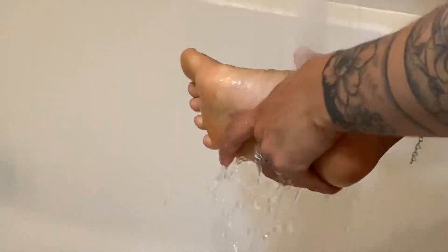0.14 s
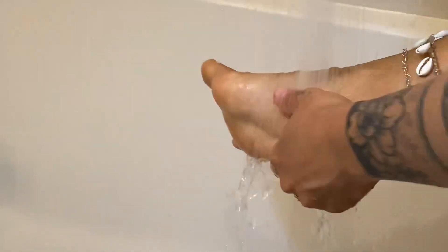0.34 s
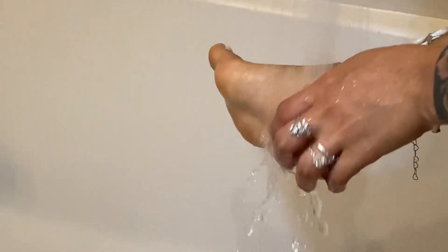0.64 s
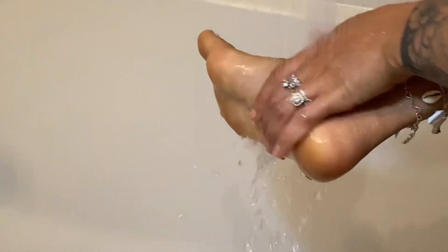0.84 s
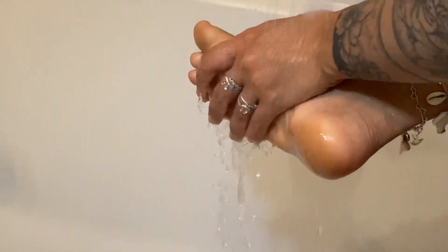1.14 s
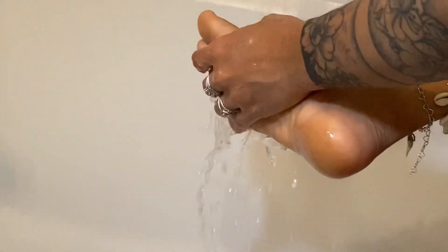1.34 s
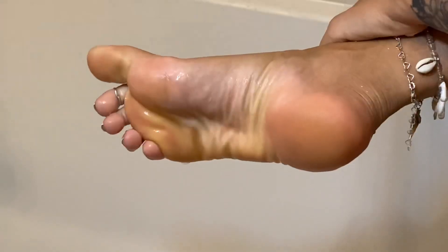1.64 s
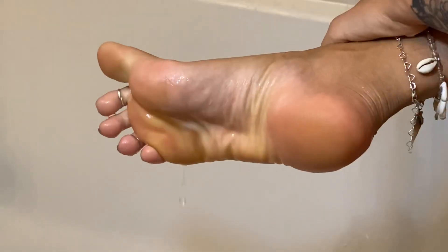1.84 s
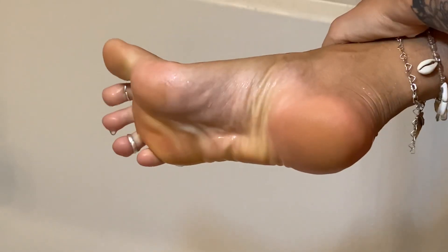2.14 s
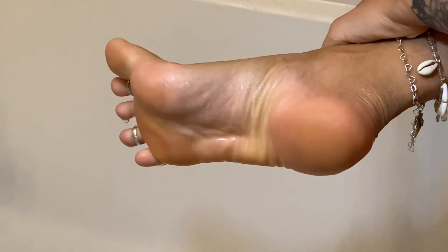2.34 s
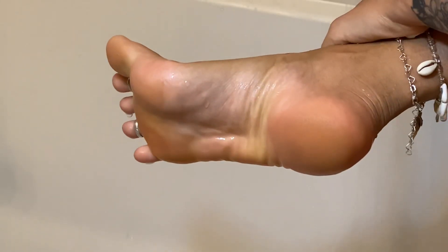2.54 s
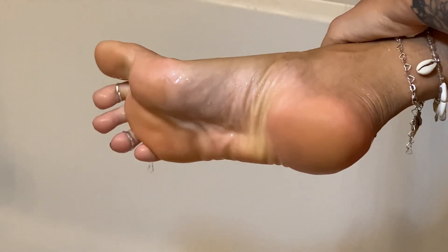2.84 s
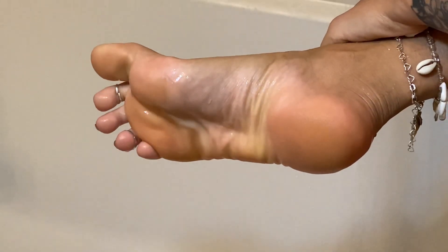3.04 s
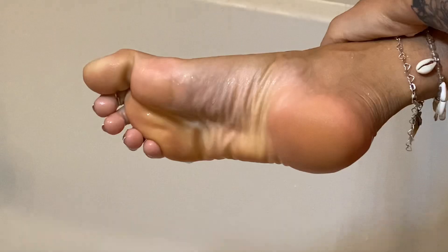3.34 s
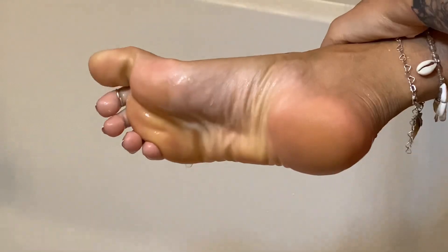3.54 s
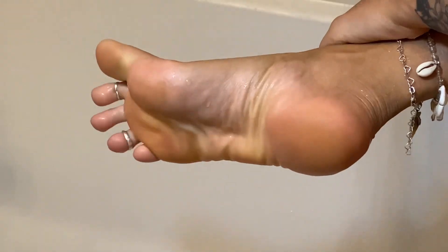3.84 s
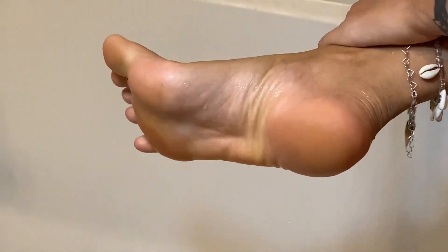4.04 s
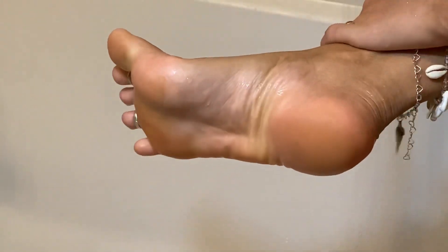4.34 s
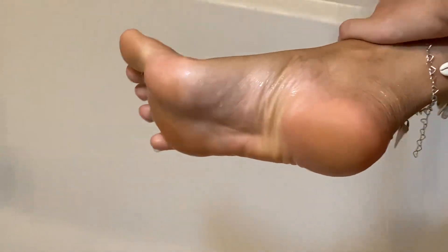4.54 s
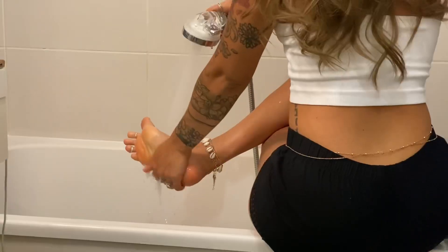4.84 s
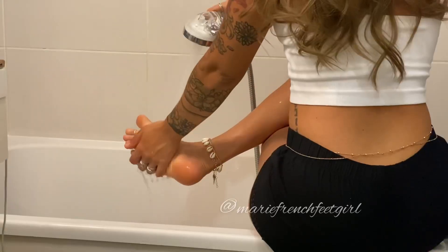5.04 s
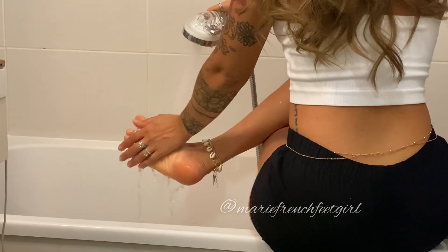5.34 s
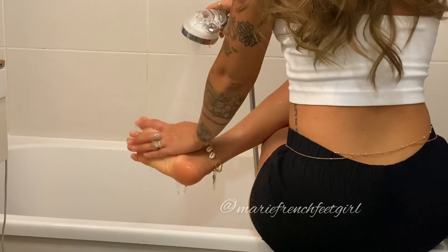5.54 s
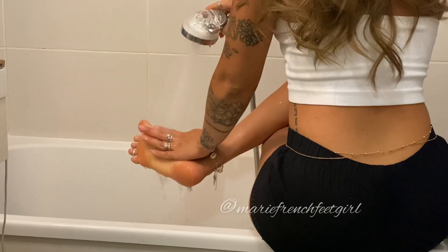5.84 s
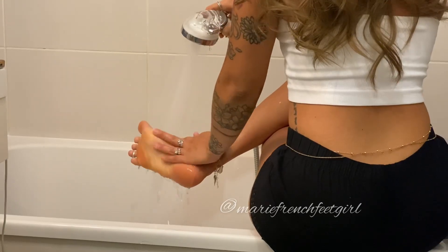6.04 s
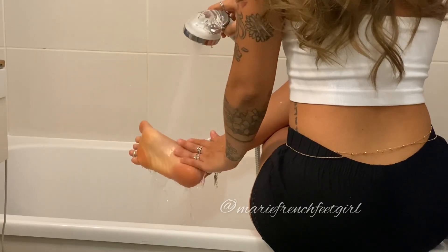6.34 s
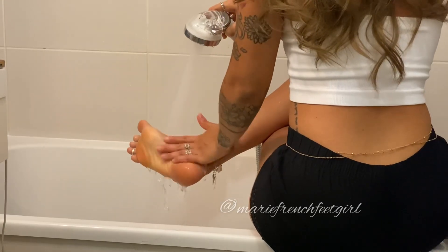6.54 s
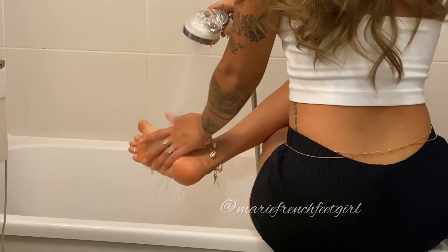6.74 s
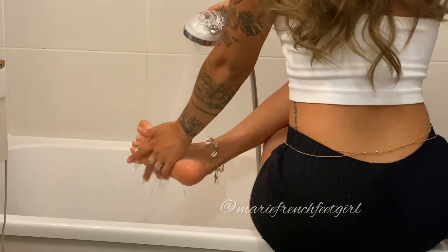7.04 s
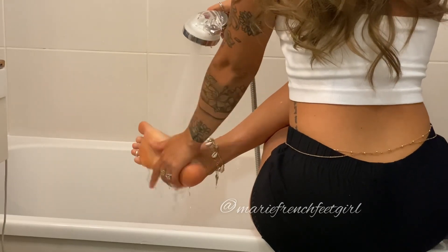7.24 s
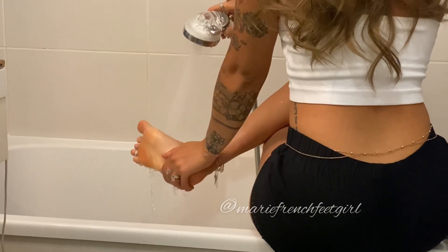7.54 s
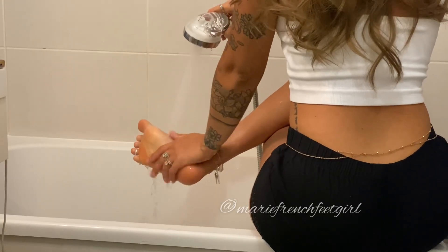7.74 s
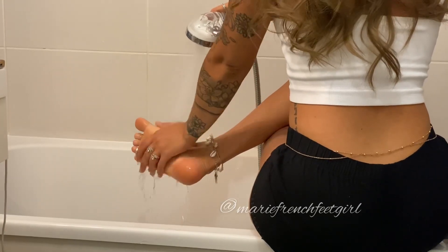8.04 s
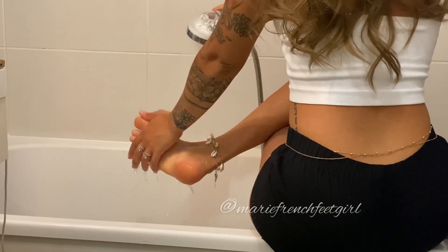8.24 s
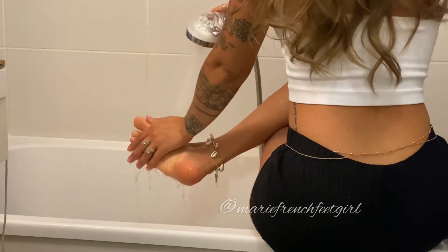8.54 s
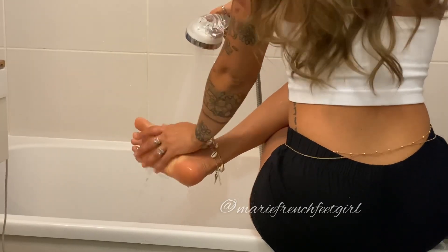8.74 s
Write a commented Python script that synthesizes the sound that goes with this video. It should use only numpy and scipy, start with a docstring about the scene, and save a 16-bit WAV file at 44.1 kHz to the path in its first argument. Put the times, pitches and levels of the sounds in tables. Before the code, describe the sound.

A hand shower runs in a small tiled bathroom. Close to the microphone, water spills off a rubbed foot in sharp irregular splats and bright patter, the tub drumming low. An abrupt change leaves only even spray hiss, pipe whistle and a flickering thin whine, with a few dull knocks. Then splashing returns from further back, softer and more echoing.

```python
"""A hand shower in a small tiled bathroom, heard in three parts joined by short fades.
First, water runs off feet into the tub close by: random drops patter and filtered bursts splat.
Then the spray hisses on without the run-off: shaped noise, singing pipe resonances and a thin whine, with knocks.
Last, the water runs off the feet again from further back, with slower splats and stronger echoes.
All through, random hits and wavering low tones make the tub shell drum."""
import sys
import numpy as np
from scipy import signal
from scipy.fft import rfft, irfft
from scipy.io import wavfile
from scipy.ndimage import uniform_filter1d

SR = 44100
rng = np.random.default_rng(int(sys.argv[2]) if len(sys.argv) > 2 else 0)


def master(y):
    """Save y as 16-bit WAV."""
    cut = np.clip(np.atleast_2d(y).T, -1, 1)
    pcm = np.round(cut * 32767)  # scale
    wavfile.write(sys.argv[1], SR, pcm.astype(np.int16))


N = 391608

# The joins between the three parts. Each row: time in seconds, fade-out in seconds, fade-in in seconds.
JOINS = [(1.475, 0.0061, 0.018), (4.662, 0.0022, 0.017)]
# Strength of the run-off from the feet, one list for the close part and one for the far part.
# Each row: time in seconds, level of the patter in dB, of the fine mist in dB, of the coarse drops in dB.
RUNOFF_LEVELS = [
    [(0, -45.5, -51, -49.5), (.12, -49.5, -51, -52.5), (.31, -40.5, -49, -56), (.43, -47, -49, -53),
     (.56, -42, -48, -57), (.83, -48.5, -49, -54), (.94, -41.5, -47, -54), (1.1, -48.5, -51, -53.5),
     (1.36, -45.5, -51.5, -49.5), (1.46, -49.5, -50, -53)],
    [(4.7, -53, -53, -71), (4.92, -46, -50.5, -58), (5.18, -50.5, -53, -75), (5.33, -47, -51, -56),
     (5.52, -47.5, -50, -57), (5.8, -51, -52, -75), (5.92, -49.5, -46.5, -57), (6.04, -49.5, -53, -60),
     (6.22, -46.5, -49.5, -51.5), (6.64, -49, -54, -52.5), (6.78, -49, -51, -66), (6.98, -56.5, -55.5, -78),
     (7.35, -46, -50.5, -55), (7.56, -48, -52, -60), (7.68, -49, -50, -55), (7.96, -45, -50, -54),
     (8.07, -53.5, -53, -82), (8.25, -50, -55, -66), (8.4, -51.5, -53.5, -58), (8.66, -46, -52.5, -59),
     (8.8, -51, -50, -58), (8.88, -52, -50, -57)],
]

T = np.arange(N) / SR  # time of every sample, seconds
F = np.arange(N // 2 + 1) * SR / N  # frequency of every spectrum bin, Hz
FIRST_JOIN_S, SECOND_JOIN_S = JOINS[0][0], JOINS[1][0]
PART = np.searchsorted([FIRST_JOIN_S, SECOND_JOIN_S], T)  # 0, 1 or 2 at every sample


def undb(db):
    """Turns decibels into a gain."""
    return 10 ** (np.asarray(db) / 20)


def unit(x):
    """Scales a sound to an rms (average strength) of 1."""
    return x / np.sqrt(np.mean(x ** 2))


def over_hz(table):
    """Reads a table of (Hz, value) at every bin, in straight lines over log frequency."""
    hz, value = np.transpose(table)
    return np.interp(np.log(F + 1), np.log(hz), value)


def over_time(lists):
    """Reads the columns of the joined lists at every sample."""
    s, *columns = np.transpose(np.concatenate(lists))
    return [np.interp(T, s, column) for column in columns]


def ring(x, hz, width):
    """Lets a sound excite one resonance, then scales it to rms 1."""
    return unit(signal.lfilter(*signal.iirpeak(hz, hz / width, fs=SR), x))


def walk(rate):
    """Slides between random levels, about `rate` new ones a second; their spread is near 1."""
    step = int(SR / rate)
    levels = np.repeat(rng.standard_normal(N // step + 1), step)
    return uniform_filter1d(levels, step)[:N]


def fading(t, t60):
    """Falls by 60 dB in t60 seconds."""
    return np.exp(-np.log(1000) * t / t60)


def drops(rate, scatter_db, size=N):
    """Makes impacts at random moments, `rate` a second; a few are much larger than the rest."""
    hit = rng.random(size) < rate / SR
    return hit * rng.standard_normal(size) * undb(scatter_db * rng.exponential(size=size))


def hum_level(steady_db, swells):
    """Gives the gain of a tone: a steady level that wanders, with strong swells rising above it."""
    wander_db, changes_per_s = 1.6, 9.9
    power = undb(steady_db + wander_db * walk(changes_per_s)) ** 2
    for s, db, length in swells:
        power += undb(db) ** 2 * np.exp(-((T - s) / (length / 2)) ** 2)
    return np.sqrt(power)


def spray():
    """The jets hiss evenly as shaped noise, while narrow resonances of pipe and head sing."""
    # Colour of the hiss. Each row: frequency in Hz, level in dB per Hz before the gain of each part.
    hiss_colour = [(300, -100), (500, -93), (1000, -98), (1350, -93.5), (1650, -92), (2050, -92.5),
                   (3600, -93.5), (5500, -93), (7000, -93.5), (7900, -90.5), (9700, -99.5), (11300, -93.5),
                   (13000, -100), (15800, -99)]
    # Resonances of pipe and head. Each row: frequency in Hz, width in Hz, level in dB before the gain of each part.
    whistle_modes = [(1294, 7.5, -80), (1388, 10, -65.5), (1445, 12, -63), (1494, 15, -64.5),
                     (1556, 15, -65.5), (1613, 33, -56.5), (1752, 29, -61), (1900, 34, -65.5),
                     (2040, 33, -73.5), (2130, 44, -66.5), (2620, 16, -67.5), (3040, 16, -70),
                     (4860, 20, -67), (5580, 60, -63.5), (5820, 40, -64.5), (6490, 18, -65),
                     (7860, 81, -62), (11050, 28, -64), (10700, 43, -80)]
    # Gain in the three parts. Each row: gain of the hiss in dB, gain of the whistle in dB.
    part_gains = [(-22, -3.5), (1.5, -0.5), (-1.5, -10.5)]
    hiss_db, sing_db = np.transpose(part_gains)[:, PART]
    hiss = irfft(rfft(rng.standard_normal(N)) * undb(over_hz(hiss_colour)), N) * np.sqrt(SR / 2)
    flow = rng.standard_normal(N)
    singing = sum(undb(db) * ring(flow, hz, width) for hz, width, db in whistle_modes)
    return hiss * undb(hiss_db + 0.38 * walk(3.8)) + undb(sing_db) * singing


def whine():
    """A thin tone and a narrow band of noise flicker unevenly in the middle part."""
    # Strong swells of the whine. Each row: time of the top in seconds, level in dB, length in seconds.
    whine_swells = [(1.56, -60, .08), (1.7, -55, .14), (1.84, -62, .05), (1.98, -59, 0.088),
                    (2.19, -60, 0.054), (2.35, -62, 0.16), (2.763, -59.5, 0.093), (2.902, -53.5, 0.26),
                    (3.17, -62, .05), (3.272, -57, 0.045), (3.505, -65, .04), (3.6, -59.5, .1),
                    (3.873, -58, .07), (4.03, -55, .04), (4.12, -59, 0.14), (4.36, -57, .08),
                    (4.59, -56, .12)]
    pitch_hz, steady_db = 4487, -64
    tone = np.sqrt(2) * np.sin(2 * np.pi * np.cumsum(pitch_hz + 3.57 * walk(30.13)) / SR)
    flicker = ring(rng.standard_normal(N), pitch_hz, 24)
    return (0.75 * tone + 0.32 * flicker) * hum_level(steady_db, whine_swells) * (PART == 1)


def tub():
    """Falling water drums the shell: low modes hum, upper ones rattle, and now and then something knocks."""
    # Upper modes of the shell. Each row: frequency in Hz, width in Hz, level in dB against each other.
    upper_modes = [(221, 55, 0.5), (281, 61, -2.5), (331.3, 45, -6.5), (422.2, 6.6, -7), (459, 24, -9),
                   (553.3, 18, -12), (642, 78, -18), (690, 47, -15.5)]
    # Lowest modes of the shell. Each row: the frequencies in the three parts in Hz, size of the wander in Hz.
    low_modes = [((60, 60, 59), 4.72), ((96, 97, 93), 6.54), ((156, 150, 144), 5.8), ((208, 215, 178),
                 4.14)]
    # Shell level in the three parts: one column for all upper modes together, then one for each low mode. Each
    # row is one part: level of all upper modes in dB, then of each low mode in dB.
    shell_levels = [(-56, -49.5, -49.5, -49, -53.5), (-57.5, -60, -62.5, -64, -61.5),
                    (-52, -53.5, -56.5, -50.5, -53.5)]
    # Strongest swells, one list for each low mode. Each row: time of the top in seconds, level in dB,
    # length in seconds.
    low_swells = [
        [(.3, -56, .2), (1.3, -60, 0.12), (1.6, -48, 0.2), (4.92, -53, 0.089), (5.46, -47, .12),
         (5.84, -48, .1), (6.2, -47, 0.1), (7.1, -46, 0.13), (7.3, -46, .15), (7.57, -49, 0.11),
         (8.68, -47, 0.12)],
        [(.07, -41, 0.17), (.29, -52, 0.052), (.48, -42.5, 0.14), (.73, -43, 0.13), (1.08, -45, 0.13),
         (1.22, -42, 0.13), (6.19, -57, .1)],
        [(.08, -49, 0.12), (.26, -38, 0.023), (.67, -43, 0.049), (.91, -48, 0.058), (1.22, -42.5, 0.12),
         (4.92, -48, 0.1), (6.186, -39, 0.065), (8.16, -63, 0.071), (8.557, -50, 0.052), (8.7, -47, 0.07)],
        [(.08, -45.5, 0.15), (.91, -43, 0.067), (2.68, -53.5, 0.051), (3.5, -56.5, 0.13), (6.2, -46, 0.22),
         (7.55, -47.5, 0.21)],
    ]
    # Knocks on the tub. Each row: start in seconds, level in dB, frequency in Hz, time to fall 60 dB in seconds.
    knocks = [(1.53, -24.5, 102.4, 0.11), (1.575, -35.5, 93, 0.24), (4.463, -31.5, 87, 0.063),
              (4.602, -33, 131, 0.094), (4.621, -21, 86, 0.059)]
    upper_db, *low_db = np.transpose(shell_levels)[:, PART]
    upper = sum(undb(db) * ring(drops(600, 1.8), hz, width) for hz, width, db in upper_modes)
    out = undb(upper_db) * unit(upper)

    body_hz, body_width_hz, body_db = 250, 96, (-52.5, -65, -60)  # broad drumming; its level in each part
    out += undb(body_db)[PART] * ring(drops(600, 0.67), body_hz, body_width_hz)

    for (hz, wander), level_db, swells in zip(low_modes, low_db, low_swells):
        pitch = np.array(hz)[PART] + wander * walk(18)
        tone = np.sqrt(2) * np.sin(2 * np.pi * np.cumsum(pitch) / SR)
        hits = drops(600, 0.6)
        rattle = np.choose(PART, [ring(hits, f, f / 8.5) for f in hz])
        mix = 0.62 * undb(0.65 * walk(26)) * tone + 0.68 * rattle
        out += hum_level(level_db, swells) * mix

    for s, db, hz, t60 in knocks:
        t = np.maximum(T - s, 0)
        onset = 1 - np.exp(-t / 0.0049)
        out += undb(db) * onset * fading(t, t60) * np.sin(2 * np.pi * hz * t)
    return out


def bubbles():
    """Drops trap tiny bubbles: short blips of a few kHz that rise in pitch."""
    per_s, against_patter_db = 130, -12
    length_cycles, glide = 15.7, 0.088  # blip length at its starting pitch; rise of pitch as a share
    out, flow_db = np.zeros(N + SR), over_time(RUNOFF_LEVELS)[0]
    for a, b, c in rng.random((int(per_s * N / SR), 3)):
        i, hz = int(a * N), 2600 * 3.02 ** b
        cycle = np.arange(int(length_cycles * SR / hz)) * hz / SR
        swell = np.sin(np.pi * cycle / length_cycles)
        blip = swell * np.sin(2 * np.pi * cycle * (1 + glide * cycle / length_cycles / 2))
        extra_db = -2.0 * np.log(1 - c)  # a few are much louder
        out[i:i + len(blip)] += undb(flow_db[i] + against_patter_db + extra_db) * blip
    return out[:N] * (PART != 1)


def runoff():
    """Drops of three sizes patter into the tub in an unsteady stream, as shaped random impacts and noise."""
    # Colour of the middle-sized drops. Each row: frequency in Hz, gain in dB.
    patter_colour = [(1500, -40), (2600, -4.5), (3600, -0.5), (6000, 1), (8000, 3), (10500, -6.5)]
    # Colour of the coarse drops. Each row: frequency in Hz, gain in dB.
    coarse_colour = [(500, 5), (1000, -13), (1800, 4.5), (2600, 2.5), (3600, 2.5), (5000, -9.5)]
    # Colour of the fine mist. Each row: frequency in Hz, gain in dB.
    mist_colour = [(5500, -46), (8000, -8), (10000, -5), (12000, -5), (13800, -24), (15800, -24)]
    surge_db, flicker_db = 1.0, 1.3  # unsteadiness: all drops together, each size alone
    surge, out = walk(12), 0
    patter_db, mist_db, coarse_db = over_time(RUNOFF_LEVELS)
    sizes = [(patter_colour, patter_db, 8000), (coarse_colour, coarse_db, 3000), (mist_colour, mist_db, 12000)]
    for colour, db, rate in sizes:
        rain = unit(drops(rate, 1.0)) + 0.6 * rng.standard_normal(N)
        rain = unit(irfft(rfft(rain) * undb(over_hz(colour)), N))
        out = out + rain * undb(db + surge_db * surge + flicker_db * walk(25))
    return out * (PART != 1)


def droplets(hz, octaves, t60, size):
    """Each slug throws short blips, scattered over its band and its tail."""
    count, loudest_db, length_s = 14, 2.5, 0.0033
    mean_delay = 0.16  # as a share of t60
    out, t = np.zeros(size + 512), np.arange(512) / SR
    a, b, c = rng.random((count, 3)).T[:, :, None]
    late = -np.log(1 - a) * mean_delay * t60
    pitch = hz * 2 ** (1.25 * octaves * (b - .5))
    swell = np.sin(np.pi * np.minimum(t / length_s, 1))
    blips = undb(loudest_db - 9.3 * c) * swell * np.sin(2 * np.pi * pitch * t * (1 + 8 * t))
    starts = np.minimum(late[:, 0] * SR, size).astype(int)
    for i, blip in zip(starts, blips):
        out[i:i + 512] += blip
    return out[:size]


def splat(hz, fine_db, octaves, rise_s, smack, t60, size):
    """One slug builds up to a broad short smack, then a fading spatter around its pitch with fine spray above."""
    hold_per_rise = 1.4  # the spatter keeps full strength for this many build-up times
    t = np.arange(size) / SR
    edge = 2 ** (np.clip(octaves, .1, 3) / 2)
    spatter = drops(20000, 0.9, size=size)

    def band(low, high):
        """Keeps one band of the spatter, at rms 1."""
        return unit(signal.sosfilt(signal.butter(2, [low, high], "band", fs=SR, output="sos"), spatter))

    broad = band(hz / edge / 1.22, hz * edge * 1.73)
    body = band(hz / edge, hz * edge)
    fine = band(hz * edge, 13500)

    smack, after = np.clip(smack, 0, 1), np.maximum(t - rise_s, 0)
    ragged = undb(0.5 * np.repeat(rng.standard_normal(size // 256 + 1), 256)[:size])  # the tail comes in clumps
    held = fading(np.maximum(after - hold_per_rise * rise_s, 0), t60)
    tail = ragged * held * (0.7 * body + 0.42 * broad + droplets(hz, octaves, t60, size))
    tail += 1.7 * undb(fine_db) * fading(after, 0.57 * t60) * fine

    brief = np.exp(-((t - rise_s) / (0.0021 + 0.15 * rise_s)) ** 2)
    slap = 0.43 * body + 0.57 * broad
    # even out chance differences, so that every smack lands at its given strength
    slap = 0.81 * slap * np.sqrt(np.sum(brief ** 2) / np.sum((brief * slap) ** 2))
    build_up = np.minimum(t / max(rise_s, 1e-4), 1) ** 0.88
    return build_up * (smack * brief * slap + (1 - smack) * tail)


def splats():
    """Large slugs of water land, and between them many small ones that follow the run-off."""
    # Large slugs. Each row: start in seconds, level in dB, centre in Hz, level of the fine spray in dB
    # against the slug, width in octaves, build-up in seconds, share of the smack from 0 to 1,
    # time for the spatter to fall 60 dB in seconds.
    large_slugs = [(.0156, -40.5, 3400, -19, 0.28, 0.0037, 0.16, .3),
                   (.0567, -43, 5070, -9, 0.34, .003, .3, .3),
                   (.213, -36.5, 3020, -20, .39, 0.0013, 0.4, 0.2),
                   (.238, -45, 3600, -8, .5, .003, 0.6, 0.18), (.2125, -42, 5500, -5, 1, .001, 0.9, 0.16),
                   (.282, -28, 3300, -20, 0.46, 0.0056, 0.72, 0.27),
                   (.322, -34, 6000, -13, 0.92, .005, 0.55, 0.21),
                   (.4254, -52, 6200, -11, .4, .002, .5, .2), (.4876, -30, 6460, -19, 1, .001, 0.4, 0.37),
                   (.502, -36, 2100, -30, .5, 0.0013, 0.66, .15),
                   (.5025, -21.5, 4020, -25, 0.8, 0.0028, 0.7, 0.26),
                   (.6312, -28.5, 4800, -19, 0.22, 0.0011, .75, 0.18),
                   (.699, -37.5, 5730, -11, 0.94, .001, 0.6, 0.25),
                   (.7603, -31.5, 3900, -20, 0.71, .0012, 0.56, 0.33),
                   (.8915, -44, 4700, 2, 0.47, .001, 0.6, 0.27),
                   (.9318, -39, 6100, -20, 0.86, .002, 0.3, 0.4),
                   (1.0025, -41, 4900, 6.5, 0.32, .001, 0.62, 0.3),
                   (1.128, -34.5, 5700, -10, .3, .001, 0.57, 0.21),
                   (1.1487, -38, 4100, -11, 1, .001, 0.44, 0.2),
                   (1.2167, -32, 7460, 0.5, 0.4, .001, 0.75, 0.21),
                   (1.26, -36, 3530, -14, 0.72, .002, 0.77, 0.18),
                   (1.279, -43, 5500, 10, 0.97, 0.00092, 0.53, 0.13),
                   (1.309, -45, 4940, 8, .63, .001, 0.65, 0.27),
                   (1.3355, -31.5, 5150, -5, 0.46, .001, 0.59, 0.3),
                   (1.3833, -37, 4470, -12, .55, .001, 0.6, 0.26),
                   (1.444, -29.5, 2900, -32, 0.84, 0.0045, 0.66, 0.36),
                   (4.688, -43, 5000, -13, .49, .004, 0.44, 0.28),
                   (4.85, -45, 4310, 6, .55, .005, 0.6, 0.24),
                   (4.8787, -36, 6150, -27, 0.85, 0.0042, 0.53, 0.29),
                   (5.048, -42, 3900, -10, 0.31, 0.0064, 0.3, 0.35),
                   (5.09, -55, 4000, -20, 0.24, 0.0074, 0.5, 0.25),
                   (5.29, -34.5, 4400, -5, 0.36, 0.0098, 0.64, 0.22),
                   (5.292, -41, 3070, -25, 0.35, 0.0061, 0.5, 0.33),
                   (5.32, -47, 4400, -25, 0.16, .005, 0.5, .2),
                   (5.4536, -38, 4700, -7, 1, 0.0052, 0.6, 0.2),
                   (5.5066, -43, 6260, -2, .55, 0.0069, 0.26, 0.28),
                   (5.528, -39, 4740, -9, .35, 0.0053, 0.37, 0.35),
                   (5.6423, -47, 2480, -10, 0.36, 0.0037, 0.5, 0.21),
                   (5.7074, -43.5, 5950, -18, 0.49, .005, 0.3, 0.3),
                   (5.722, -42.5, 3620, -18, 0.99, 0.0044, 0.37, 0.25),
                   (5.8954, -48, 4640, 4, .55, 0.0043, .5, 0.47),
                   (6.0551, -44.5, 3310, -13, 0.89, .004, 0.47, 0.33),
                   (6.134, -34.5, 2630, -14, 0.7, 0.0034, 0.3, 0.22),
                   (6.14, -30.5, 2380, -32, 0.35, .005, 0.74, 0.18),
                   (6.145, -41, 5730, -3, 0.57, 0.0089, 0, 0.3), (6.158, -40, 2320, -25, .6, .005, .3, .3),
                   (6.162, -33.5, 5800, -12, 0.25, 0.0065, 0.75, 0.4),
                   (6.185, -42, 6000, -7, .4, 0.0064, .2, 0.35),
                   (6.192, -41.5, 3270, -20, 0.61, .006, 0.44, 0.54),
                   (6.5183, -46, 5630, -6, 0.78, 0.0035, 0.1, 0.55),
                   (6.656, -44.5, 4630, 4, 0.42, .004, 0.5, 0.53),
                   (6.74, -50, 4300, -15, 0.55, .008, 0.3, 0.27),
                   (6.858, -48, 5400, -20, .3, .005, .3, 0.18),
                   (6.9644, -46, 5160, -16, 0.29, .004, 0.37, 0.37),
                   (7.0, -44, 3950, -20, 0.38, .004, .5, 0.23),
                   (7.1227, -43, 6760, -19, 0.54, 0.0034, 0.4, 0.28),
                   (7.16, -39, 5790, -10, 1, 0.0045, 0.85, 0.23),
                   (7.257, -44, 5040, -14, 0.58, 0.0066, 0.2, 0.24),
                   (7.278, -37.5, 5700, -16, 0.95, 0.0061, 0.5, 0.23),
                   (7.3, -42.5, 3540, -1, 0.33, 0.0051, 0.45, .2),
                   (7.336, -40, 5300, -16, .2, 0.018, 0.4, .2),
                   (7.388, -40, 3380, -20, 0.35, 0.0054, 0.4, 0.24),
                   (7.401, -41, 5270, -15, 0.42, .006, .6, .15),
                   (7.459, -43, 2940, -2, 0.86, 0.0088, 0.35, 0.18),
                   (7.631, -42, 3270, -12, 0.8, 0.0061, 0.28, 0.32),
                   (7.766, -40, 4470, -14, .6, 0.006, 0.7, 0.16),
                   (7.857, -38.5, 5460, -20, 0.8, 0.01, 0.25, 0.33),
                   (7.919, -39, 5330, -2, 1, 0.0096, 0.7, 0.23),
                   (8.144, -42, 3800, -11, 0.72, 0.0044, 0.23, 0.28),
                   (8.171, -35, 7100, -33, 0.48, 0.0061, 0.34, 0.17),
                   (8.17, -39.5, 2860, -25, 0.66, 0.0071, 0.3, 0.28),
                   (8.176, -40, 4600, -20, 0.51, 0.0066, 0.44, 0.27),
                   (8.194, -41, 4930, -27, 0.67, 0.0047, 0.4, 0.38),
                   (8.24, -45, 2700, -16, .45, 0.004, 0.54, 0.25),
                   (8.281, -39, 4440, -10, 0.65, 0.0085, 0.25, 0.31),
                   (8.439, -42, 3130, -8, 0.8, 0.0074, 0.2, 0.19),
                   (8.47, -47.5, 3320, -20, .6, .006, 0.3, .25),
                   (8.587, -37.5, 4960, -0.5, 0.4, 0.0062, 0.57, 0.31),
                   (8.638, -39, 3030, -20, 0.28, 0.004, 0.36, 0.27),
                   (8.674, -33, 3880, -28, 1, 0.0083, 0.5, 0.23),
                   (8.705, -49, 5630, -20, .3, .004, .5, .15), (8.8064, -44, 6840, -7, 0.44, .003, 0.5, .2)]
    rise_near_s, rise_far_s = 0.001, 0.0049  # small slugs; from further back the tiles blur each smack
    out, flow_db = np.zeros(N + SR), over_time(RUNOFF_LEVELS)[0]
    slugs = list(large_slugs)
    for a, b, c in rng.random((500, 3)):
        s = a * N / SR
        if not FIRST_JOIN_S < s < SECOND_JOIN_S:
            db = flow_db[int(s * SR)] - 5.5 + 5.2 * c
            rise_s = rise_near_s if s < SECOND_JOIN_S else rise_far_s
            slugs.append((s, db, 4200 * 2.48 ** b, -15, .3, rise_s, .3, .15))
    for s, db, *kind in slugs:
        sound = splat(*kind, size=13200 if db > -44 else 8800)
        to_joins = [int((join - s) * SR) for join, *_ in JOINS if join > s]
        end = min([len(sound)] + to_joins)  # the next join stops the tail
        start = int(s * SR)
        out[start:start + end] += undb(db) * sound[:end]
    return out[:N]


def tiles(x):
    """Quick dense echoes of tub and tiles smear each splash, more so from further back."""
    t60_s, near_db, far_db = 0.15, -11, -7  # echo levels are against the direct sound
    t = np.arange(int(SR * .15)) / SR
    echo = rng.standard_normal(len(t)) * fading(t, t60_s) * (t > .002)
    wet = signal.oaconvolve(x, echo / np.sqrt(np.sum(echo ** 2)))[:N]
    return x + wet * np.array([undb(near_db), 0, undb(far_db)])[PART]


def scene():
    """Mixes a sound shared by both channels with a part of opposite sign left and right, varying by band."""
    # Strength of the opposite-sign part of the whole sound. Each row: frequency in Hz, gain in dB.
    differing = [(100, -18.5), (350, -11), (700, -3), (1200, -2), (1600, -9.5), (1850, -42), (2200, -81),
                 (2900, -70), (4200, -15), (6000, -9.5), (6500, -32), (7600, -36), (8300, -25.5),
                 (10000, 1), (11000, -27), (12300, -6), (13700, -29), (14600, -17), (15300, -25)]
    # Extra opposite-sign part of the splashes and bubbles alone. Each row: frequency in Hz, gain in dB.
    splash_differing = [(2500, -45), (3000, -25), (3900, -24), (4600, -43)]

    def layers():
        """Plays every layer once with fresh random draws: (splashes with echoes, the rest)."""
        return tiles(bubbles() + splats()), spray() + whine() + runoff() + tub()

    splashes, rest = layers()
    side_splashes, side_rest = layers()
    side = rfft(side_splashes + side_rest) * undb(over_hz(differing))
    side = irfft(side + rfft(side_splashes) * undb(over_hz(splash_differing)), N)
    dips = [np.interp(T, [s - out, s, s + back], [1, .08, 1]) for s, out, back in JOINS]
    shared = splashes + rest
    return np.prod(dips, axis=0) * np.array([shared + side, shared - side])


def record(dry):
    """The two channels differ in level and turn in phase with frequency; sub-bass and the very top are cut."""
    # Level balance of the channels. Each row: frequency in Hz, left minus right in dB.
    balance = [(40, -0.5), (150, 2.5), (500, 3), (800, 1.5), (1250, 4), (1750, -0.5), (16000, 0.5)]
    # Phase of right against left. Each row: frequency in Hz, phase in radians.
    phase_turn = [(1100, 0), (1380, .3), (1640, -.2), (1850, 0), (2500, 0), (3200, .3), (6100, .35),
                  (6500, 0), (7900, 0), (8250, 3.14), (8850, 3.14), (10700, 0), (11500, 0), (13200, -3.14),
                  (14100, -3.14), (15400, -6.28)]
    top_hz = 15700
    half = undb(over_hz(balance) / 2) * np.exp(-.5j * over_hz(phase_turn))  # each channel takes half
    channels = irfft(rfft(dry) * [half, 1 / half], N)
    channels = signal.sosfilt(signal.butter(3, 45, "high", fs=SR, output="sos"), channels)
    return signal.sosfilt(signal.ellip(14, .3, 75, top_hz, fs=SR, output="sos"), channels)


dry = scene()
out = record(dry)
master(out)
```